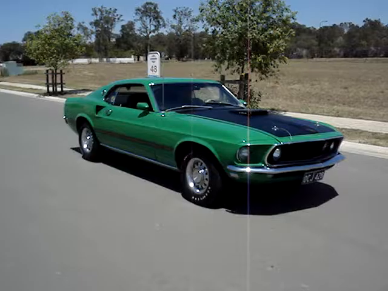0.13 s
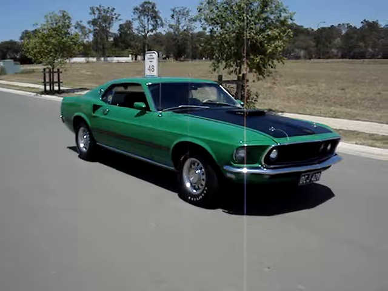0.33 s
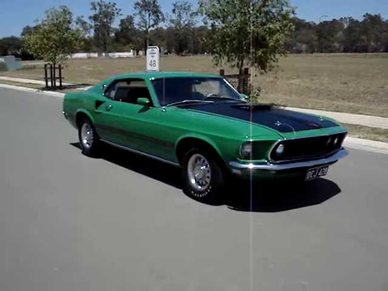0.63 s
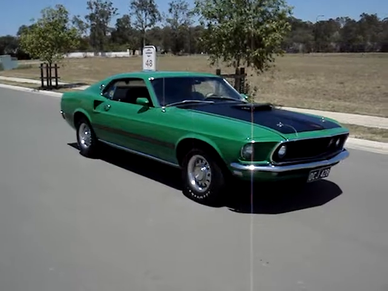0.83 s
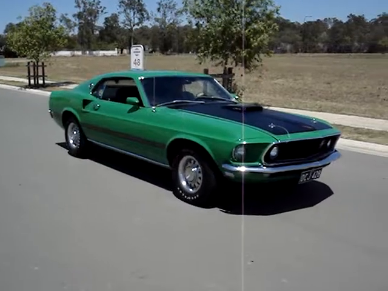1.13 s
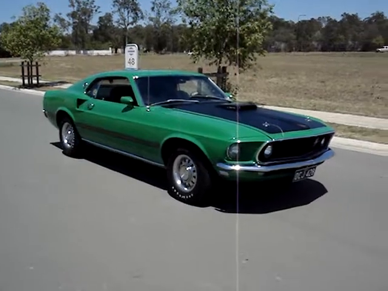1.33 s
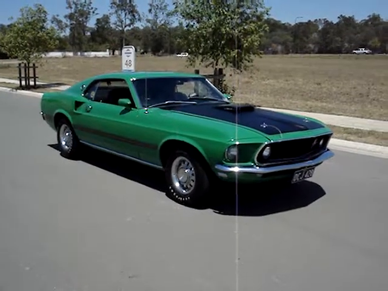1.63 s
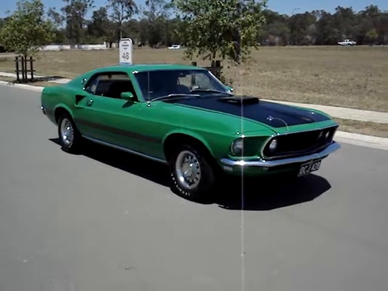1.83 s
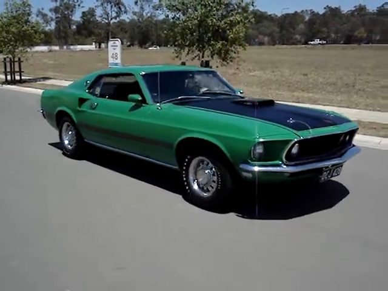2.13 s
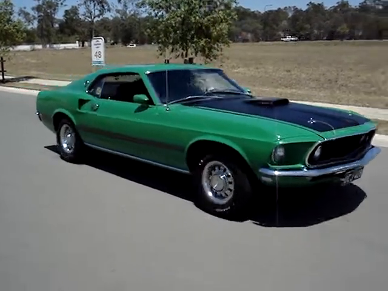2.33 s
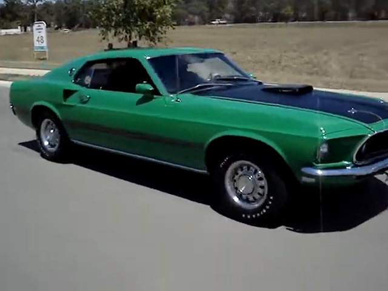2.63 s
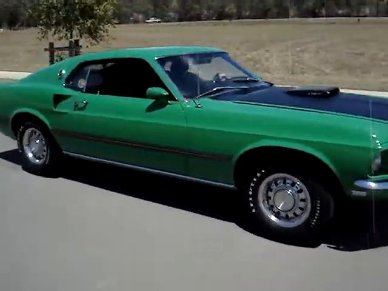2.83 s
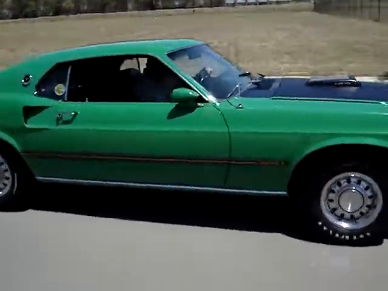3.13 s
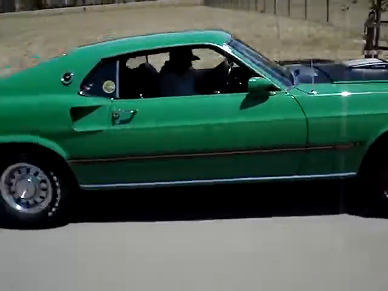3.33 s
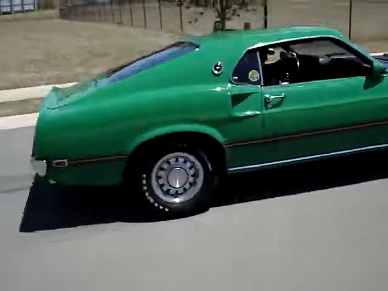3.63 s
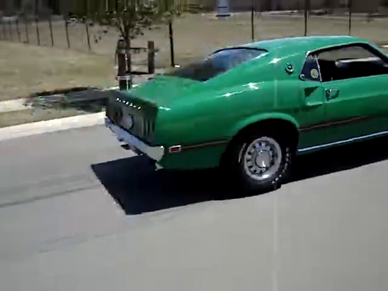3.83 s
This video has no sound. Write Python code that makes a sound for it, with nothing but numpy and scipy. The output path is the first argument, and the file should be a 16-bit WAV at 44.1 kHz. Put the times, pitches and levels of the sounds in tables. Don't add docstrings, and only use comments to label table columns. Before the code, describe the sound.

Muscle car engine idles low under wind thumps, then launches with screeching tyres and rising roar

```python
import sys
import numpy as np
from scipy import signal
from scipy.fft import rfft, irfft
from scipy.io import wavfile
from scipy.ndimage import uniform_filter1d, map_coordinates

SR = 44100
rng = np.random.default_rng(int(sys.argv[2]) if len(sys.argv) > 2 else 0)


def makeup_ratio(level_db):
    decades = np.asarray(level_db, float) / 20
    return 10 ** decades


def log_audio(samples):
    frames = np.atleast_2d(samples).T
    limited = np.clip(frames, -1, 1)
    pcm = np.round(limited * 32767).astype(np.int16)
    wavfile.write(sys.argv[1], SR, pcm)


N = 176400
T = np.arange(N) / SR

# centre_s, length_s, level_db
GUSTS = [(.2, 0.084, -39), (0.451, .05, -29.5), (0.529, .04, -29), (0.562, 0.027, -27.5),
         (.597, .02, -25.5), (0.63, .015, -28.5), (0.671, .04, -31), (0.801, .03, -33), (0.896, 0.026, -31),
         (1.063, .025, -32.5), (1.406, 0.033, -36.5), (1.602, 0.13, -41.5), (1.877, 0.036, -38),
         (1.97, 0.051, -32.5), (2.1, 0.027, -40), (2.183, 0.026, -44), (2.479, 0.017, -42)]


def unit(x):
    return x / np.sqrt(np.mean(x ** 2) + 1e-20)


def along(points, hz):
    f, v = np.transpose(points)
    return np.interp(np.log(hz + 1), np.log(f + 1), v)


def curves(rows):
    s, *columns = np.transpose(rows)
    return [np.interp(T, s, column) for column in columns]


def wobble(rate):
    coarse = np.arange(0, N + 16, 16)
    knots = rng.standard_normal(2000)
    return np.interp(np.arange(N), coarse, map_coordinates(knots, [coarse * rate / SR], mode="mirror"))


def ramp(s, rise_s):
    return np.sin(np.pi / 2 * np.clip((T - s) / rise_s, 0, 1)) ** 2


def fade(s, rise_s):
    return 1 / (1 + np.exp(-(T - s) / rise_s))


def rush(spectrum, body, patchy_db):
    hz, _, z = signal.stft(rng.standard_normal(N), SR, nperseg=1024)
    patches = uniform_filter1d(rng.standard_normal(z.shape), size=8, axis=0)
    patches = unit(uniform_filter1d(patches, size=5, axis=1))
    colour_db = along(spectrum, hz)
    for centre, width, db in body:
        colour_db = colour_db + db / (1 + (2 * (hz - centre) / width) ** 2)
    z = z * makeup_ratio(colour_db[:, None] + patchy_db * patches)
    return unit(signal.istft(z, SR, nperseg=1024)[1][:N])


def engine():
    # time_s, firing_rate_hz, exhaust_tone_db, roar_db
    rev_up = [(.08, 55, -44, -45), (.25, 57, -44, -44), (.4, 62, -50, -44), (.62, 82, -36, -42),
              (.8, 87, -35.5, -42), (1.37, 87, -35, -41.5), (1.45, 95, -38, -38), (1.56, 102, -37, -37),
              (1.84, 110, -38, -36), (1.93, 124, -36, -32), (2.15, 150.5, -32, -30), (2.42, 180, -29, -30),
              (2.62, 202, -30.5, -29), (2.85, 221, -39, -31), (3.03, 234, -40, -30), (3.45, 279, -38, -29),
              (3.68, 292, -38, -28), (4, 290, -40, -28.5)]
    hz, tone_db, roar_db = curves(rev_up)
    turns = np.cumsum(hz * (1 + 0.0022 * wobble(30))) / SR
    pulse = 1 + .12 * np.cos(2 * np.pi * turns) + 0.1 * np.cos(np.pi * turns / 2)
    noise = makeup_ratio(roar_db + 0.43 * wobble(25.24)) * pulse * roar()
    return order_tone(turns, 1, tone_db) + side_orders(turns, hz, roar_db) + fan(turns) + noise


def order_tone(turns, k, db):
    level = makeup_ratio(db + 1.7 * wobble(15))
    return level * np.sqrt(2) * np.sin(2 * np.pi * (k * turns + rng.random()))


def side_orders(turns, hz, roar_db):
    # multiple_of_firing_rate, level_over_roar_db
    bank_orders = [(.5, -16.5), (0.751, -16.5), (1.25, -5), (1.5, -3.5), (1.75, -15), (2, 1.5), (2.249, -2),
                   (2.498, -9), (2.999, -5.5)]
    # frequency_hz, gain_db
    pipe_colour = [(50, 4), (90, -11), (130, -3.5), (175, 5), (230, -16), (340, -16.5), (530, -8.5),
                   (900, -12)]
    behind_db = -7 * fade(3.52, 0.027)
    out = 0
    for k, db in bank_orders:
        out = out + order_tone(turns, k, roar_db + db + behind_db + along(pipe_colour, k * hz))
    return out


def fan(turns):
    centre_s, span_s = 2.33, .27
    return order_tone(turns, 1.59, -37 - 9 * ((T - centre_s) / span_s) ** 4)


def roar():
    # frequency_hz, density_db_per_hz
    idle_colour = [(18, -42), (30, -26), (69, -35.5), (173, -12), (349, -22.5), (515, -9.5), (880, -14.5),
                   (10000, -29.5), (13000, -62), (22000, -120)]
    nose_colour = [(30, -41), (90, -29), (350, -21.5), (550, -11.5), (900, -14), (2200, -14.5),
                   (4500, -21.5), (10000, -32)]
    tail_colour = [(30, -41), (200, -24.5), (450, -17), (800, -10), (2000, -8.5), (3000, -17.5),
                   (5000, -22), (10000, -29.5)]
    # centre_hz, width_hz, gain_db
    idle_body = [(240, 60, 14.5), (550, 300, 3), (1150, 110, 5.5), (1550, 110, 5.5), (2200, 550, -1.5)]
    nose_body = [(535, 47, 2), (1416, 140, -8), (1642, 130, 8), (2820, 380, 3.5)]
    tail_body = [(550, 150, 0), (1190, 150, 5), (1560, 130, -2.5), (380, 150, 3)]
    load, past = fade(2.04, 0.094), fade(3.1, 0.048)
    idle = makeup_ratio(8.5) * np.sqrt(1 - load) * rush(idle_colour, idle_body, patchy_db=0.5)
    nose = makeup_ratio(7) * np.sqrt(load * (1 - past)) * rush(nose_colour, nose_body, patchy_db=1.5)
    tail = makeup_ratio(8.5) * np.sqrt(load * past) * rush(tail_colour, tail_body, patchy_db=2.5)
    return idle + nose + tail


def tyres():
    # time_s, slip_pitch_hz, level_db, overtone_db, pitch_scatter_share
    squeal = [(1.92, 1040, -13, -9, .007), (1.97, 1055, -12, -9, .008), (2.06, 1012, -12, -12, .006),
              (2.1, 995, -19, -5, .012), (2.23, 1000, -14, -9, .012), (2.36, 995, -19, -6, .018),
              (2.56, 995, -19, -4, .022), (2.7, 1010, -17, -8, .022), (2.83, 1030, -16, -11, .016),
              (3.05, 1030, -18, -7, .016), (3.13, 1025, -23, -1, .02), (3.3, 1025, -21, 0, .016),
              (3.55, 1040, -21, -1, .018), (3.72, 1045, -18, -5, .016), (3.8, 1045, -22, -2, .02),
              (4, 1015, -18, -7, .018)]
    # pitch_offset_in_scatters, level_db, overtone_db
    tread_patches = [(0, -1.5, -0.5), (-2.5, -7, 1.5), (2, -8.5, -3), (-5.5, -13.5, 2.5)]
    # multiple, level_over_overtone_db
    overtones = [(.53, -11), (2, -0.5), (3, -17), (4, -22)]
    slip_s = 1.907
    hz, level_db, over_db, scatter = curves(squeal)
    together, locked = chirps()
    between = makeup_ratio(-3.5 * ramp(2.085, .02)) * (1 - locked)
    near_db = 8 * (2 * fade(3.66, 0.12) - 1)
    out = 0
    for offset, patch_db, edge_db in tread_patches:
        wander = .6 * offset + 0.607 * wobble(60) + 1.303 * wobble(300)
        turns = np.cumsum(hz * (1 + scatter * wander)) / SR
        wave = between * np.sin(2 * np.pi * turns)
        for k, db in overtones:
            level = makeup_ratio(over_db + edge_db + db + (k > 2.5) * near_db + 2.77 * wobble(150))
            wave = wave + level * np.sin(2 * np.pi * k * turns + 0.58 * wobble(150))
        out = out + makeup_ratio(patch_db + 190 * scatter * wobble(75)) * wave
    out = out + scrub(slip_s)
    return 1.33 * makeup_ratio(level_db) * ramp(slip_s, .016) * out + together


def scrub(slip_s):
    # frequency_hz, density_db_per_hz
    grit_colour = [(300, -44.5), (700, -8), (1700, 10), (2800, 2), (4000, -2.5), (6000, -19.5),
                   (10000, -31)]
    level_db = -18 - 6 * (T - slip_s) / 2.04 + 1.6 * wobble(39.72)
    return makeup_ratio(level_db) * rush(grit_colour, [], patchy_db=4.5)


def chirps():
    # time_s, length_s, level_db, pitch_hz
    whole_slips = [(2.052, 0.024, -10, 1010), (2.128, 0.041, -12, 991), (2.165, 0.012, -15.0, 974),
                   (2.195, 0.016, -12.0, 1003), (2.233, 0.045, -12.5, 999.4), (2.269, 0.018, -13, 977),
                   (2.309, 0.043, -17.5, 998), (2.353, 0.013, -17.5, 998), (2.385, 0.021, -16.5, 971),
                   (2.426, 0.012, -13.0, 977), (2.476, 0.019, -14, 1012), (2.55, 0.013, -16.5, 1006),
                   (2.613, 0.02, -18, 983), (2.63, 0.0073, -16, 996), (2.641, 0.029, -15, 1011),
                   (2.668, 0.017, -13.5, 1034), (2.713, 0.008, -16, 1042), (2.743, 0.037, -15, 1013),
                   (2.781, 0.015, -10.5, 1030), (2.8, 0.048, -15.5, 1023), (2.834, 0.022, -12.5, 1029),
                   (2.884, 0.011, -15, 1051), (2.907, 0.044, -15.5, 1020), (2.937, 0.009, -14.0, 1021),
                   (2.965, 0.015, -14, 1048), (2.985, 0.024, -17.5, 1032), (3.009, 0.017, -15.0, 1016),
                   (3.043, 0.013, -17.0, 1036), (3.078, 0.029, -15.5, 1010), (3.181, 0.036, -19, 1032),
                   (3.363, 0.024, -14.5, 1021), (3.436, 0.026, -17.5, 1021), (3.494, 0.027, -17.5, 1038),
                   (3.592, 0.04, -18.5, 1034), (3.663, 0.027, -18, 1060), (3.721, 0.047, -16.5, 1041),
                   (3.824, 0.033, -18.5, 1049), (3.894, 0.022, -14.5, 1032), (3.942, 0.0084, -15, 1040),
                   (3.964, 0.05, -18.5, 1018)]
    level, locked = np.zeros(N), np.zeros(N)
    for s, length, db, _ in whole_slips:
        burst = np.exp(-np.clip((T - s) / (.52 * length), -4, 4) ** 4)
        level = np.maximum(level, makeup_ratio(db) * burst)
        locked = np.maximum(locked, burst)
    hz = curves(whole_slips)[2] * (1 + .012 * wobble(200))
    tone = np.sqrt(2) * np.sin(2 * np.pi * np.cumsum(hz) / SR)
    return level * makeup_ratio(1.2 * wobble(120)) * tone, .85 * locked


def tailpipes():
    # frequency_hz, density_db_per_hz
    jet_colour = [(4000, -41), (5600, -9), (6250, 0), (7000, -10), (9000, -40)]
    return makeup_ratio(-47.5 + 2.5 * wobble(30)) * fade(3.6, .05) * rush(jet_colour, [], patchy_db=2.0)


def wind():
    # frequency_hz, density_db_per_hz
    eddy_colour = [(40, -6), (120, 1), (300, -2.5), (600, -6.5), (1200, -16), (2000, -32), (5000, -70)]
    band = signal.butter(2, [25, 160], "band", fs=SR, output="sos")
    rumble = unit(signal.sosfilt(band, rng.standard_normal(N)))
    eddies = makeup_ratio(-5 + 3 * wobble(90)) * gust_level(0) * rush(eddy_colour, [], patchy_db=1.5)
    return thumps() + 0.17 * gust_level(0.06) * rumble + eddies


def gust_level(spread_s):
    return sum(makeup_ratio(db) * np.exp(-((T - s) / (length + spread_s)) ** 2) for s, length, db in GUSTS)


def thumps():
    most, rate, pitch_hz, cycles = 24, 330, 250, 1.9
    out, t = np.zeros(N + SR), np.arange(SR // 25) / SR
    for s, length, db in GUSTS:
        time_dev, pitch_dev, level_dev = rng.standard_normal((3, most))
        time_dev[0] = pitch_dev[0] = level_dev[0] = 0
        hz = pitch_hz * np.exp(.45 * pitch_dev.clip(-1.3) + .06 * (db + 30.5))
        count = np.clip(2 * length * rate - np.arange(most), 0, 1)
        level = count * makeup_ratio(db - 2 + 1.5 * level_dev)
        u = t * hz[:, None]
        window = np.sin(np.pi * np.clip(u / cycles, 0, 1))
        thump = -np.cos(2 * np.pi * (u - cycles / 2)) * window * level[:, None]
        first = np.clip((s + .6 * length * time_dev) * SR, 0, N).astype(int)
        at = first[:, None] + np.arange(len(t))
        out += np.bincount(at.ravel(), thump.ravel(), len(out))
    return out[:N]


def snaps():
    # time_s, pitch_hz, level_db under full scale (minus pulls, plus pushes)
    slaps = [(0.1384, 262, -19.5), (.412, 260, 25.5), (.447, 105, 20), (.464, 220, -21), (.5, 400, 22),
             (.521, 300, -15.5), (.5317, 483, -14.5), (.5364, 600, -16.5), (0.5457, 260, -14.5),
             (.5524, 600, -11.5), (0.56, 300, -19), (0.5699, 380, 11), (0.5741, 520, 14.5),
             (0.5872, 300, -18), (.5922, 650, -14), (.596, 300, -13), (0.6008, 282, -15),
             (.6085, 960, -14.5), (.6155, 597, -19), (0.6203, 300, -20), (0.6305, 330, -18),
             (.635, 330, 17), (.903, 240, -21), (1.062, 230, -17), (1.071, 230, -17.5)]
    t = np.arange(2 * SR) / SR
    out = np.zeros(N)
    for s, hz, db in slaps:
        envelope = np.exp(-(1.92 * hz * (t - s)) ** 2)
        out[:len(t)] += np.sign(db) * makeup_ratio(-abs(db)) * np.cos(2 * np.pi * hz * (t - s)) * envelope
    return out


def scene():
    return (engine() + tyres() + tailpipes() + wind() + snaps())[None]


def slots(slot_s):
    single = rng.random(800)[(T / slot_s).astype(int)]
    double = rng.random(800)[(T / slot_s / 2).astype(int)]
    return np.minimum(single, 2 * double)


def treble_gaps(x):
    from_hz, band_hz, slot_s = 4900, 560, .0075
    spectrum = rfft(x)
    band = np.minimum((np.fft.rfftfreq(N, 1 / SR) - from_hz) // band_hz, 8)
    shared = slots(slot_s) / (.2 * np.exp(-(T / 2.4) ** 4) + .01)
    for k in range(9):
        empty = (slots(slot_s) < .04) | (shared < .4 ** (8 - k))
        x = x - uniform_filter1d(1. * empty, size=64) * irfft(spectrum * (band == k), N)
    return x


def overload(x):
    limit, hardness = np.where(x > 0, .52, .9), 3
    return x / (1 + np.abs(x / limit) ** hardness) ** (1 / hardness)


def low_pass(x):
    return signal.sosfilt(signal.butter(12, 11250, fs=SR, output="sos"), x)


def record(dry):
    x = overload(dry * ramp(.075, .008))
    x = signal.sosfilt(signal.butter(1, 50, "high", fs=SR, output="sos"), x)
    x = irfft(rfft(treble_gaps(x)) * (np.fft.rfftfreq(N, 1 / SR) < 10170), N)
    is_open = (np.arange(N) > .07 * SR) * (1 - ramp(3.9992, 0.00074))
    return low_pass(x * is_open)


dry = scene()
out = record(dry)
log_audio(out)
```